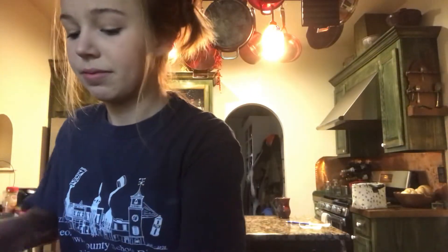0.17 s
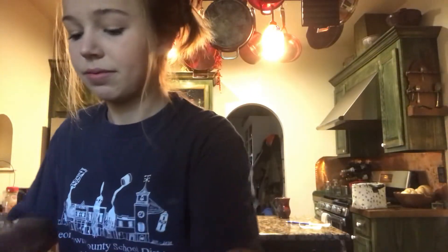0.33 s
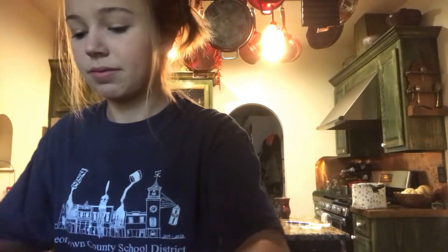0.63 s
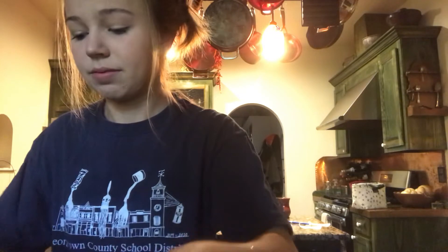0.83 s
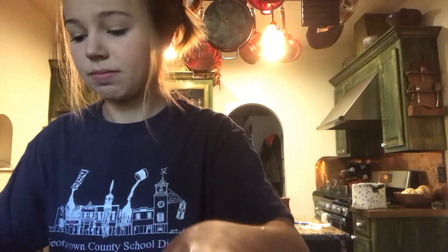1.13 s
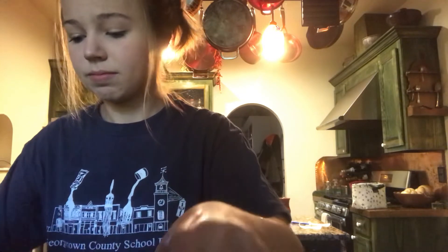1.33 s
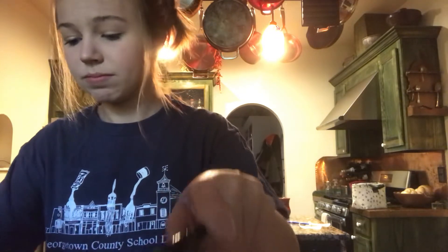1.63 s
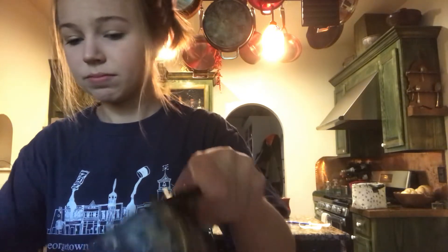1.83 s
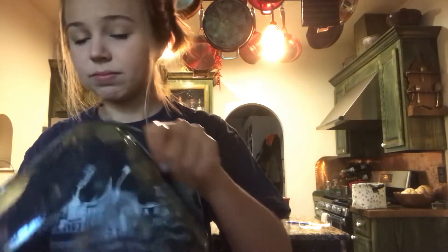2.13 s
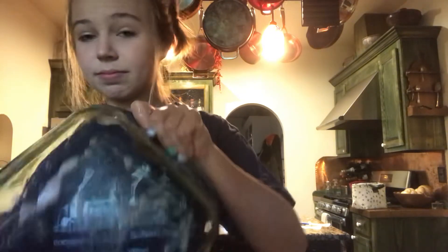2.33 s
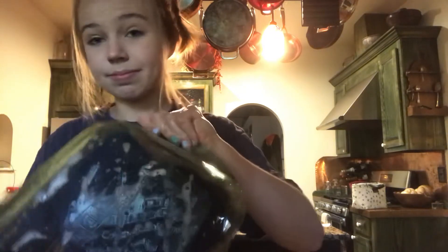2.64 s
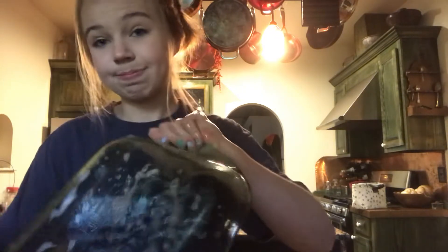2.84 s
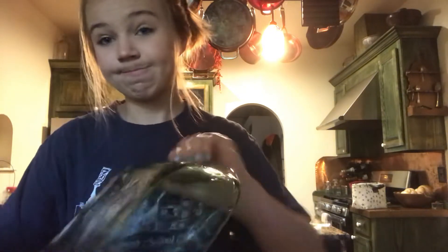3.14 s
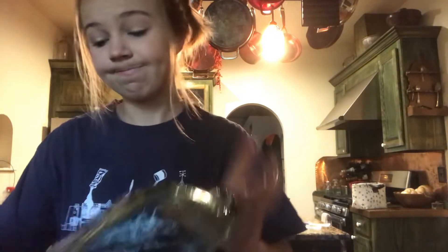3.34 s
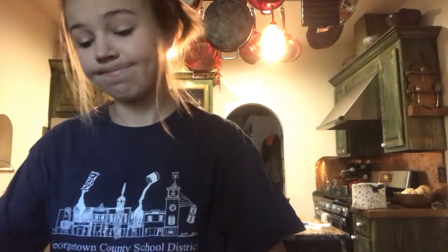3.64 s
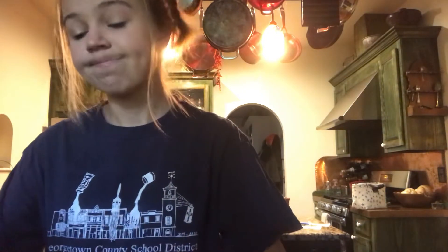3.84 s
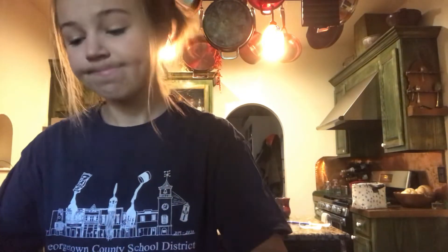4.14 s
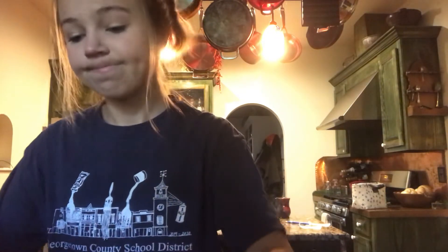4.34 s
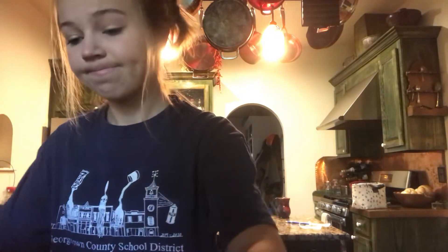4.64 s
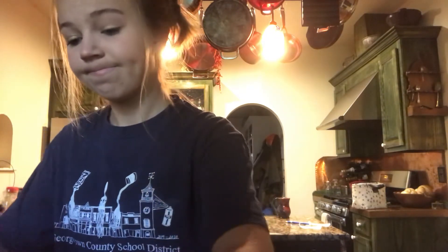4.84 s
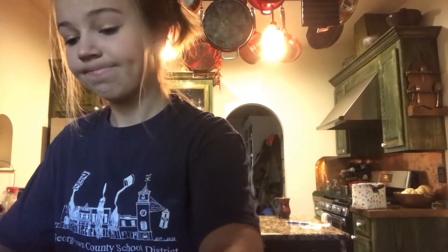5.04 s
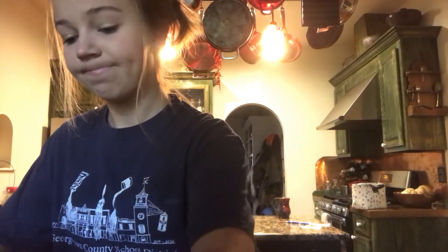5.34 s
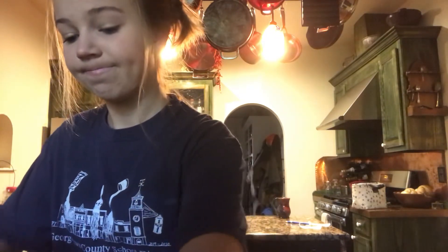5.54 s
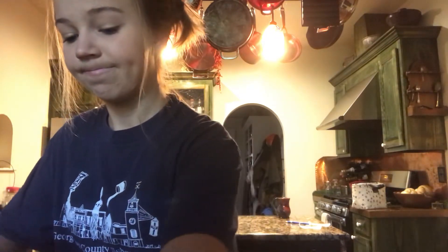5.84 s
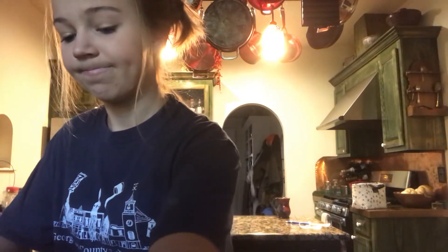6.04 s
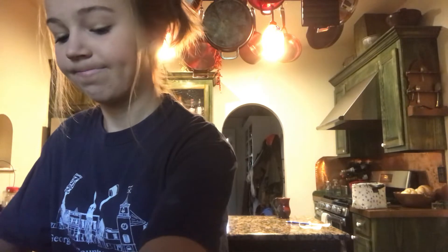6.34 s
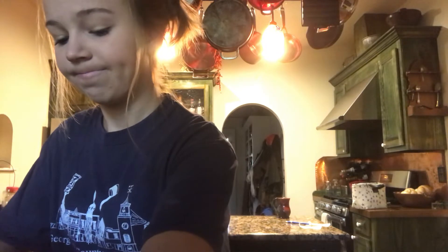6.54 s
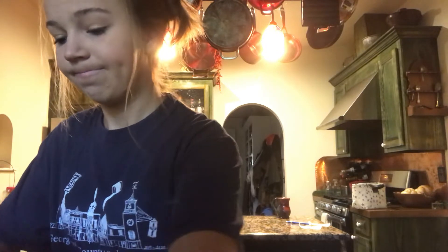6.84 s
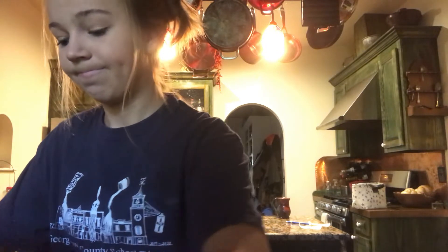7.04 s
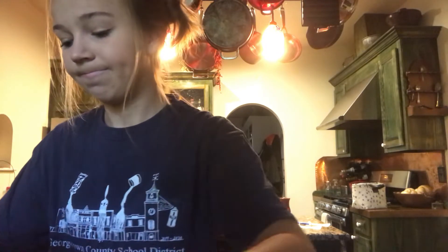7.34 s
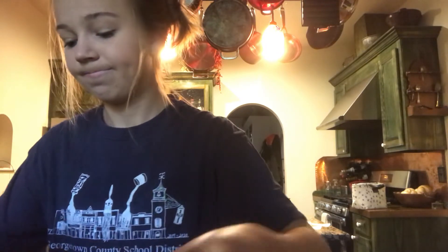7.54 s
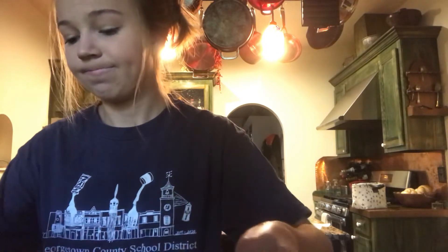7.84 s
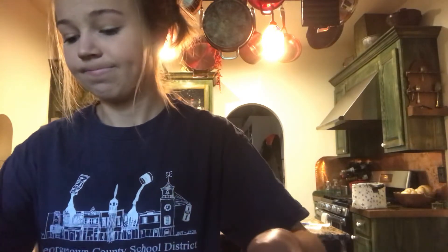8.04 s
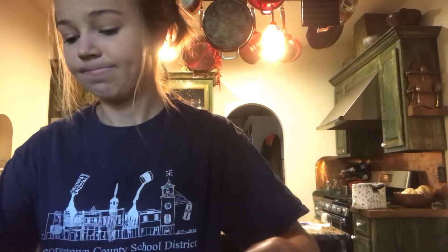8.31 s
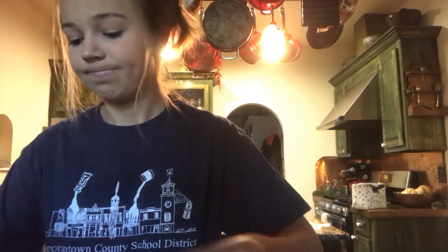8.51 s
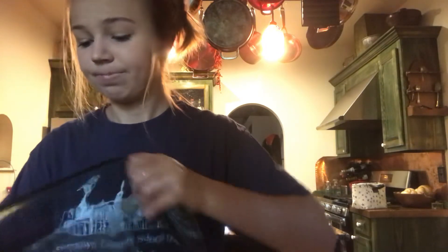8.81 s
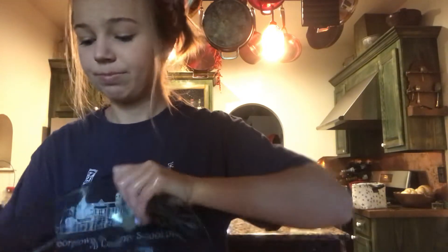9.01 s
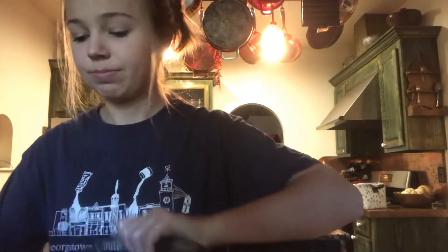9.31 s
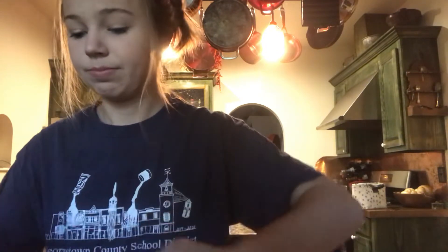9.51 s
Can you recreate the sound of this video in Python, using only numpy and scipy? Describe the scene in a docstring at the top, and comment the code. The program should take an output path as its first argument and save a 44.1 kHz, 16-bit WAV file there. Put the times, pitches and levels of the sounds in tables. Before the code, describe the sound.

A tap runs into a kitchen sink for the whole ten seconds or so, a soft steady rush under fluttering hiss and spatter. The splashing brightens and thins as a heavy glass baking dish is turned in the stream. At about 0.6 seconds the dish knocks once against the basin. Water gushes off with small gurgles near 1 and 2 seconds, with a bright bubble plop just after 2. The rim clinks at 3.7 seconds. From 4.6 to 6.6 seconds comes a cluster of knocks, well above the water, each a short glassy ring with a dull clatter, quickly damped; the loudest falls at 4.8, with other strong ones at 5, 5.5 and 6.6. The spray eases around 6 seconds, then returns, with more gushes near 7.2 and 8.6. Scattered drops tick and faint bumps sound throughout. Everything is close and mono, with short kitchen reverberation.

```python
"""Tap water runs over a heavy glass baking dish in a kitchen sink, close to one small microphone.
The stream breaks into droplets that hiss and spatter as the dish is lifted, turned and lowered.
Gathered water gushes off and gurgles; single drops tick and trapped bubbles plop.
The dish knocks against the basin several times and rings until the hands damp it.
Behind it all are the steady rush of the tap and the short reverberation of the kitchen."""
import sys
import numpy as np
from scipy import signal
from scipy.fft import rfft, irfft, next_fast_len
from scipy.io import wavfile
from scipy.ndimage import uniform_filter1d

SR = 44100
rng = np.random.default_rng(int(sys.argv[2]) if len(sys.argv) > 2 else 0)


def pcm_store(signal):
    """Save signal as 16-bit PCM."""
    levels = np.round(np.clip(np.atleast_2d(signal), -1, 1) * 32767)
    wavfile.write(sys.argv[1], SR, levels.astype(np.int16).T)


N = 426447

# spectra of the water's hollow slosh, bright splash and fine spray: f/Hz, level/dB
SLOSH_SPECTRUM = [(500, -14), (1100, -10.5), (2000, -13), (2700, -3), (3350, 0.5), (3700, -0.5), (4200, -6),
                  (6500, -49)]
SPLASH_SPECTRUM = [(700, -22.5), (1200, -10), (2100, -13), (3500, -9.5), (4200, 1.5), (5500, 0.5),
                   (6700, -1), (7800, -9.5), (10000, -29), (15000, -32)]
SPRAY_SPECTRUM = [(1000, -16), (3000, -21), (6000, 0), (8000, 0), (9300, 3), (10350, -3), (11200, -0.5),
                  (13500, -3), (16000, -6.5)]
# the dish is held in the stream: start/s, end/s, splash level/dB, spray level/dB
RINSES = [(0.0, 0.6, -56, -54.5), (0.893, 1.258, -51, -46.5), (1.297, 1.9, -54.5, -53.5),
          (1.895, 3.424, -49.5, -47.5), (3.533, 3.9, -47.5, -51), (3.94, 5.562, -47.5, -53.5),
          (6.822, 7.55, -50.5, -62), (7.23, 7.51, -56, -48), (7.55, 9.67, -53, -52),
          (8.57, 9.24, -55, -48.5)]
# gathered water runs off the tilted dish: t/s, level/dB
GUSHES = [(0.9, -50.5), (1.17, -51), (1.94, -48.5), (2.06, -47.5), (2.18, -46.5), (3.35, -52.5),
          (4.531, -49.5), (5.35, -55), (7.17, -51), (7.3, -52.5), (7.621, -53.5), (8.59, -47)]
GUSH_PEAK_S = 0.052

# the dish meets the basin: t/s, level/dB, part struck, contact hardness/Hz, time until damped/s
KNOCKS = [(0.646, -27.5, "base", 4000, 0.13), (3.734, -28, "rim", 6000, 0.03),
          (4.601, -31, "base", 1490, 0.014), (4.604, -32, "corner", 1100, 0.07),
          (4.8156, -16, "corner", 5000, 0.076), (4.9834, -25.5, "corner", 2000, 0.018),
          (5.029, -20.5, "side", 650, 0.11), (5.480, -21.5, "side", 1660, 0.02),
          (5.570, -29.5, "side", 450, 0.03), (6.051, -28, "side", 1900, .14),
          (6.5539, -20, "side", 4180, .18)]
# parts of the dish, in the order of the level columns below
DISH_PARTS = ("base", "rim", "corner", "side")
# modes of the dish: f/Hz, t60/s, level/dB when struck on the base, rim, corner, side
DISH_MODES = [(82,0.72,-13,-16.5,-28.5,-46), (236,0.15,-9,-27,-15,-58), (256,0.16,-2,-27,-14,-35),
              (379,0.14,4,-19,-16,-13), (454.6,0.21,-11,-35,-10,-13.5), (479,0.11,-3.5,-6.5,3,2.5),
              (737,0.7,-21.5,-36,-3.5,-20.5), (821,0.04,-33,-29,-26,3.5), (893,0.12,-33,-21,-3.5,-7),
              (911,0.1,-1,-19,-27,-19), (1115,0.18,-5,-8.5,-17,-18), (1186,0.091,-8,-9,-7,-2),
              (1219,0.061,3.5,-7,1,4), (1378,0.062,5,-4,-4,-5), (1529,0.47,-27,-4.5,-10.5,-16),
              (1678,0.11,-2.5,-9,-19,-6), (1716,0.021,1.5,10,-16,-29), (1830,0.076,-30,-7,-0.5,-29),
              (2616,0.12,-4,-31,-17.5,-32), (2660,0.078,-29,-7,-6.5,-12), (2802,0.13,-31,-5,-12,-4),
              (3070,0.066,-42,5,-16,-30), (3295,0.075,-32,-26,-10,-29), (3570,0.08,-29,-2.5,-35,-14)]
# dense, dull response of the basin: f/Hz, level/dB
BASIN_SPECTRUM = [(40, -29), (200, -2.5), (300, 0), (450, 3), (650, 7), (900, 6), (1250, 5), (1800, 0),
                  (2150, -11), (2800, -6), (3600, -11.5), (6500, -12), (12000, -31)]
# how much of a blow the basin takes up, by part of the dish: clatter/dB, thud/dB
BASIN_SHARE = {"base": (-0.062, -2.5), "rim": (-4, -28), "corner": (-7, -19), "side": (-5.5, -25)}

# heavy drops on glass and steel: t/s, level/dB, f/Hz
DROP_TICKS = [(0.197, -35.5, 6000), (0.336, -37.5, 3380), (1.195, -34.5, 4000), (1.266, -37, 4770),
              (1.291, -36, 4200), (1.412, -34, 3970), (2.393, -36, 3200), (2.874, -35.5, 4260),
              (4.256, -33.5, 4800), (5.129, -30.5, 5660), (5.365, -36, 3500), (6.369, -38, 7000),
              (7.110, -30, 4800), (7.708, -41, 11500), (7.912, -35, 5300), (9.373, -33.5, 4900)]
# trapped bubbles: t/s, level/dB, f/Hz
BUBBLE_PLOPS = [(1.040, -48, 1150), (1.160, -43, 1150), (1.363, -51, 650), (2.020, -37, 2980),
                (2.074, -28, 3030), (2.210, -38, 1190), (3.465, -36.5, 3330), (7.194, -40, 2500),
                (7.665, -52, 1100), (8.288, -35.5, 1280), (8.469, -41, 1430), (8.584, -40.5, 1360)]
PLOP_OCTAVES, PLOP_CYCLES = 0.28, 116   # bandwidth; cycles to fall by 60 dB
# soft bumps against the basin: t/s, level/dB, f/Hz
BASIN_BUMPS = [(0.966, -47, 129), (2.098, -44, 158), (2.6, -40.5, 302), (3.768, -48.5, 83),
               (4.045, -47, 215), (4.819, -43, 75), (7.28, -46, 126), (8.231, -39.5, 177)]

# steady rush of the tap over the low murmur of the room: f/Hz, level/dB
TAP_SPECTRUM = [(25, -14), (55, 3), (100, 1.5), (200, 0), (270, -5), (380, -3), (480, -10), (780, -10),
                (1150, -8.5), (1800, 3.5), (2150, -1.5), (2800, 1.5), (3400, -6.5), (9000, -22.5)]
# resonances of the spout: f/Hz, width/Hz, rms level/dB
SPOUT_MODES = [(588, 36, -69.5), (970, 57, -69.5), (1442.5, 29, -59), (1566, 46, -57), (2300, 10, -66.5),
               (2524, 40, -74), (3930, 41, -61.5)]


def water():
    """The stream breaks into droplets on basin and dish, in quick uneven spurts."""
    slosh_gain, splash_gain, spray_gain = flow()
    spurts_db = flutter(per_s=80)
    slosh = coloured(kitchen(droplets(per_s=2500, spread_db=8.0), wet_db=3.5), SLOSH_SPECTRUM)
    splash = coloured(kitchen(droplets(per_s=8000, spread_db=3.0), wet_db=-12), SPLASH_SPECTRUM)
    spray = coloured(kitchen(droplets(per_s=16000, spread_db=3.5), wet_db=-6.5), SPRAY_SPECTRUM)
    out = slosh * slosh_gain * from_db(1.3 * flutter(per_s=55))
    for hiss, gain, echo, depth_db in (splash, splash_gain, 0.13, 1.2), (spray, spray_gain, 0.26, 0.78):
        combed = wall_echoes(hiss, echo)
        flicker_db = depth_db * flutter(per_s=70)
        wander_db = 1.12 * drift(per_s=7)   # the hands move in the stream
        out += combed * gain * from_db(spurts_db + flicker_db + wander_db)
    return out


def flow():
    """Gains of slosh, splash and spray: the free stream, the gushes and the rinses add in power."""
    t, gush = np.arange(N) / SR, np.zeros(N)
    age = np.arange(SR) / SR / GUSH_PEAK_S
    for s, db in GUSHES:
        add(gush, s, (from_db(db) * age * np.exp(1 - age)) ** 2)
    # the stream falling freely into the basin, plus each sound's share of the gushes
    slosh = from_db(-58.5) ** 2 + gush * from_db(0.2) ** 2
    splash = from_db(-51) ** 2 + gush * from_db(2.3) ** 2
    spray = from_db(-51.7) ** 2 + gush * from_db(0.5) ** 2
    enter_s, leave_s = 0.069, 0.12
    for start, end, splash_db, spray_db in RINSES:
        held = np.clip((t - start) / enter_s, 0, 1) * np.clip(1 - (t - end) / leave_s, 0, 1)
        slosh += held * from_db(splash_db - 9) ** 2
        splash += held * from_db(splash_db) ** 2
        spray += held * from_db(spray_db) ** 2
    return np.sqrt([slosh, splash, spray])


def droplets(per_s, spread_db):
    """Droplets land at random, each an impulse of its own size."""
    sizes = from_db(spread_db * np.minimum(rng.exponential(1, N), 4.5))
    return (rng.random(N) < per_s / SR) * sizes * rng.choice([-1, 1], N)


def wall_echoes(x, echo):
    """Echoes from dish and basin walls comb the hiss; their paths shift as the dish moves."""
    n = np.arange(N)
    for lag_s in (.0008, .0014, .0031):
        lag = lag_s * SR * (1 + 0.0716 * drift(per_s=2.5))
        x = x + echo * np.interp(n - lag, n, x)
    return rms_one(x)


def knocks():
    """Each part of the dish favours its own modes; the basin clatters and thuds under the blow."""
    glass, basin, t = np.zeros(N), np.zeros(N), np.arange(SR // 2) / SR
    click_hz, clatter_needs_hz = 5400, 796   # softer contacts hardly stir the basin
    hz, t60, *part_db = np.transpose(DISH_MODES)
    rings = np.array([dying(t, ring_s) * np.cos(2 * np.pi * f * t) for f, ring_s in zip(hz, t60)])
    for s, db, part, hard_hz, free_s in KNOCKS:
        swell = 1 - dying(t, 0.0051 + 18.0 / hard_hz)   # a soft, wet contact builds up slowly
        strength = from_db(db + part_db[DISH_PARTS.index(part)]) * excited(hz, hard_hz)
        grip = dying(np.maximum(t - free_s, 0), t60=0.14)   # the hand stops the ring
        click_gain = from_db(db - 14.5) * excited(click_hz, hard_hz)
        click = click_gain * burst(t, click_hz, octaves=1.0, t60=0.025)
        add(glass, s, swell * grip * (strength @ rings) + click)
        fall = swell * dying(t, t60=0.1)
        clatter = coloured(rng.standard_normal(len(t)) * fall, BASIN_SPECTRUM)
        clatter *= np.sqrt(np.mean(fall ** 2))
        thud = burst(t, hz=229, octaves=0.69, t60=0.13)
        clatter_db, thud_db = BASIN_SHARE[part]
        blow = from_db(db) * excited(clatter_needs_hz, hard_hz)
        add(basin, s, blow * (from_db(clatter_db) * clatter + from_db(thud_db) * thud))
    return kitchen(glass, wet_db=-14) + kitchen(basin, wet_db=-6)


def excited(hz, hard_hz):
    """How strongly a contact drives a frequency: a soft one leaves the high modes still."""
    return 1 / np.sqrt(1 + (hz / hard_hz) ** 4)


def drops_and_bumps():
    """Single drops tick, trapped bubbles plop, the basin is bumped softly."""
    out, t = np.zeros(N), np.arange(SR // 2) / SR
    for s, db, hz in DROP_TICKS:
        add(out, s, from_db(db) * burst(t, hz, octaves=0.55, t60=0.031))
    for s, db, hz in BUBBLE_PLOPS:
        add(out, s, from_db(db) * burst(t, hz, PLOP_OCTAVES, t60=PLOP_CYCLES / hz))
    for s, db, hz in BASIN_BUMPS:
        add(out, s, from_db(db) * burst(t, hz, octaves=1, t60=16 / hz))
    return kitchen(out, wet_db=-12)


def gurgles():
    """Each gush traps seven bubbles of random pitch, much louder in a strong gush."""
    out, t = np.zeros(N), np.arange(SR // 4) / SR
    centre_hz, spread_octaves = 853, 1.09
    strongest_db = max(db for s, db in GUSHES)
    for s, db in GUSHES:
        gain = from_db(-53.5 + 1.5 * (db - strongest_db))
        for when, pitch in rng.random(size=(7, 2)):
            hz = centre_hz * 2 ** (spread_octaves * (2 * pitch - 1))
            bubble = burst(t, hz, PLOP_OCTAVES, t60=PLOP_CYCLES / 2 / hz)
            add(out, s + GUSH_PEAK_S * (.5 + 1.4 * when), gain * bubble)
    return kitchen(out, wet_db=-8)


def tap():
    """Behind the splashing, turbulence rushes through the tap and sings in the spout."""
    out = from_db(-53.5) * coloured(rng.standard_normal(N), TAP_SPECTRUM)
    for hz, width_hz, db in SPOUT_MODES:
        radius = np.exp(-np.pi * width_hz / SR)
        feedback = [1, -2 * radius * np.cos(2 * np.pi * hz / SR), radius ** 2]
        ring = signal.lfilter([1, 0, -1], feedback, rng.standard_normal(N))
        out += from_db(db) * rms_one(band(ring, hz, octaves=0.34))
    return out


def kitchen(x, wet_db):
    """The direct sound reaches the microphone first, then the diffuse tail of the room."""
    t = np.arange(SR // 2) / SR
    build_up = 1 - dying(t, t60=0.071)
    tail = rng.standard_normal(len(t)) * dying(t, t60=0.43) * build_up
    return x + from_db(wet_db) * signal.fftconvolve(x, tail / np.linalg.norm(tail))[:N]


def burst(t, hz, octaves, t60):
    """A brief noisy ring around hz, with the energy of a decay that starts at rms 1."""
    fall = dying(t, t60)
    ring = band(rng.standard_normal(len(t)) * fall, hz, octaves)
    return rms_one(ring) * np.sqrt(np.mean(fall ** 2))


def coloured(x, spectrum):
    """Give a signal a smooth spectrum; rms 1."""
    hz, db = np.transpose(spectrum)
    size = next_fast_len(len(x))
    f = np.maximum(np.fft.rfftfreq(size, 1 / SR), 1)
    gain = from_db(np.interp(np.log(f), np.log(hz), db))
    return rms_one(irfft(rfft(x, size) * gain, size)[:len(x)])


def band(x, hz, octaves):
    """Band-pass around hz."""
    edges = np.clip(hz * 2 ** (np.array([-.5, .5]) * octaves), 10, .45 * SR)
    return signal.sosfilt(signal.butter(2, edges, "band", fs=SR, output="sos"), x)


def flutter(per_s):
    """Quick random motion without slow swells; rms 1."""
    motion = drift(per_s)
    return rms_one(motion - uniform_filter1d(motion, size=SR // 14))


def drift(per_s):
    """Glide between random values, per_s of them a second."""
    knots = rng.standard_normal(int(N / SR * per_s) + 2)
    return np.interp(np.arange(N) / SR * per_s, np.arange(len(knots)), knots)


def dying(t, t60):
    """Exponential decay, 60 dB down after t60 seconds."""
    return from_db(-60 * t / t60)


def from_db(db):
    """Decibels to gain."""
    return 10 ** (np.asarray(db) / 20)


def rms_one(x):
    """Scale to an rms of 1."""
    return x / np.sqrt(np.mean(x ** 2) + 1e-20)


def add(out, s, sound):
    """Mix a sound in, starting at s seconds."""
    i = round(s * SR)
    out[i:i + len(sound)] += sound[:N - i]


def scene():
    """Everything at the kitchen sink, from close by, in mono."""
    return (knocks() + drops_and_bumps() + gurgles() + water() + tap())[None]


def record(dry):
    """The small microphone loses the deep bass; the top is cut steeply."""
    low_hz, top_hz = 40, 15800
    thin = signal.sosfilt(signal.butter(3, low_hz, "high", fs=SR, output="sos"), dry)
    return signal.sosfilt(signal.ellip(12, .1, 85, top_hz, fs=SR, output="sos"), thin)


dry = scene()
out = record(dry)
pcm_store(out)
```